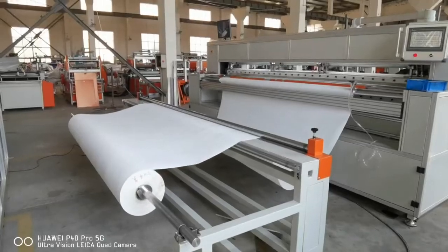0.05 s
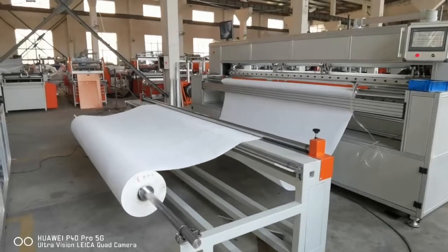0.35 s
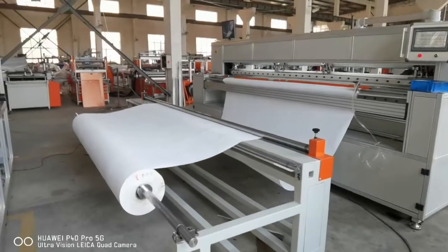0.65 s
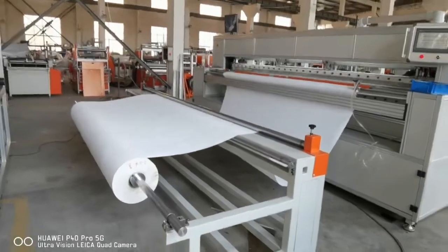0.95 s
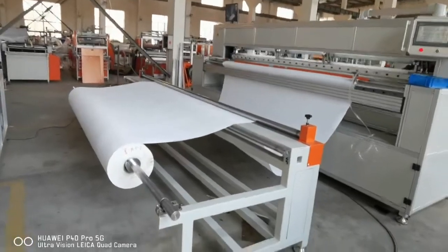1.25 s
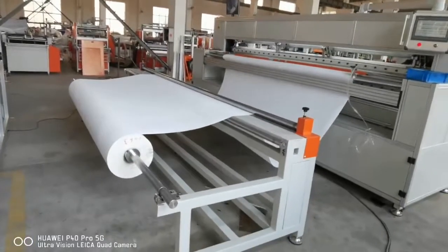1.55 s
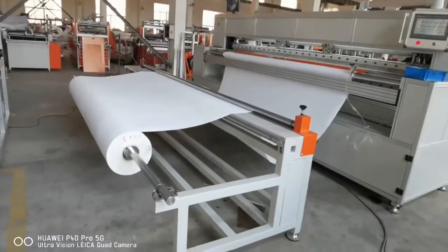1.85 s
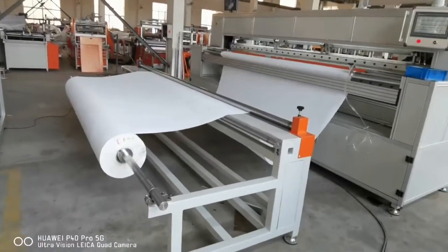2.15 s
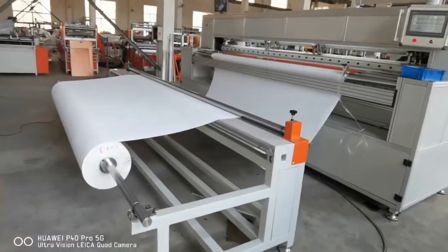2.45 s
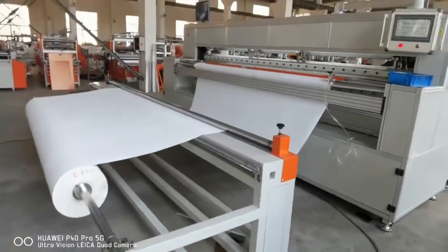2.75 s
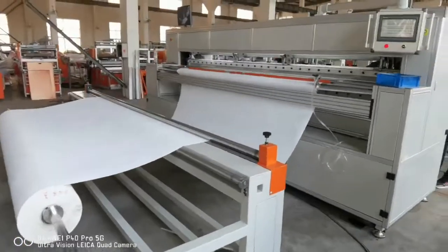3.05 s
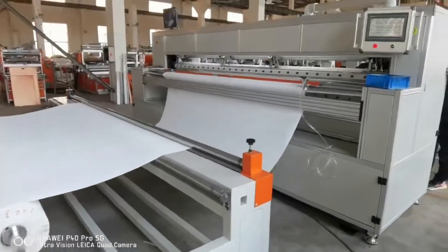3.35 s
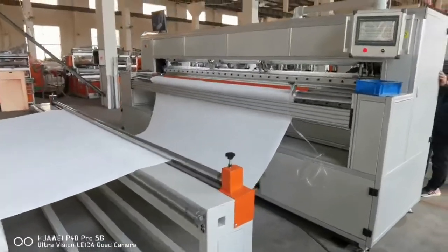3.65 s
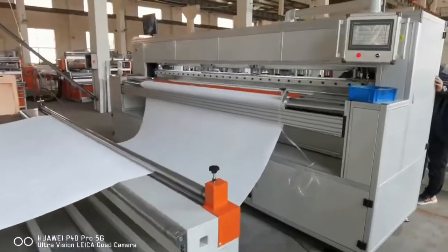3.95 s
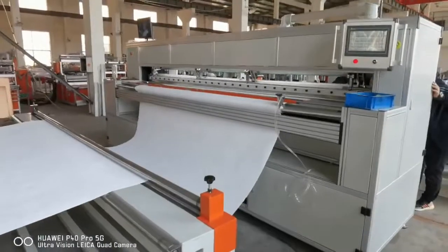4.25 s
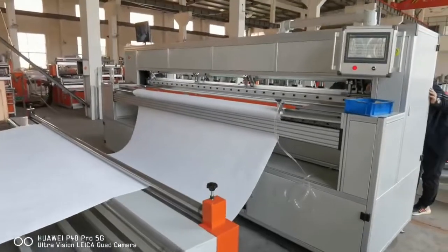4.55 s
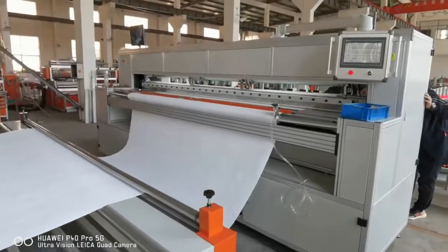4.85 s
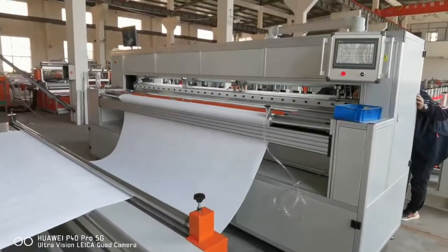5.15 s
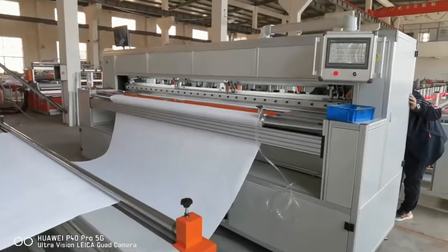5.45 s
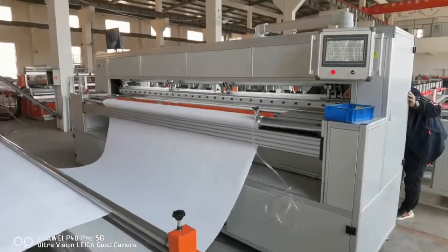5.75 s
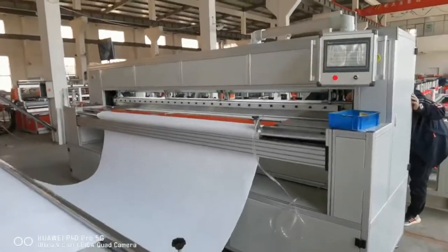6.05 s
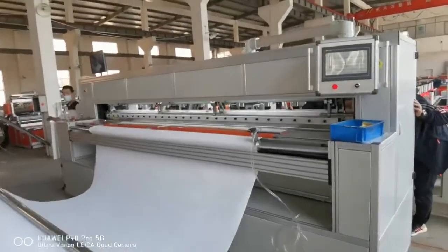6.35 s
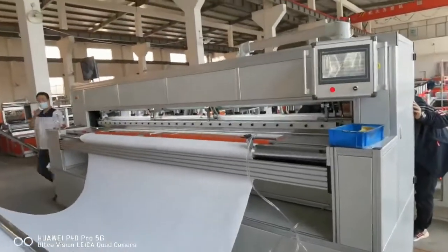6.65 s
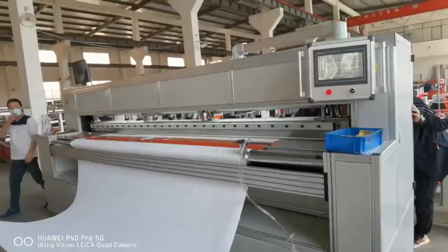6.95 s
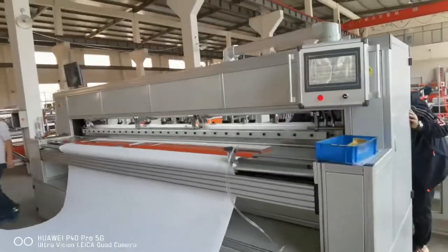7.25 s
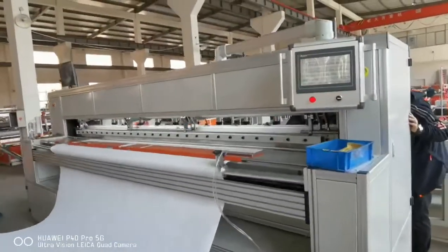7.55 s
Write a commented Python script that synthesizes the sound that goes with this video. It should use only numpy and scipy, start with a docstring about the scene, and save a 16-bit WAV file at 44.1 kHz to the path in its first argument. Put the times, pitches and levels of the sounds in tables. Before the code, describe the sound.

A harsh air blast becomes a fading hiss, then short squealing spurts, while a factory machine whirrs and knocks steadily.

```python
"""A harsh blast of air, close to the microphone, settles into a hissing jet that fades after three seconds.
Out in the factory hall a pleating machine folds filter paper, about one stroke a second:
its drive whirrs up and down, the blade knocks on the steel frame and the pressing bar clacks after it.
As the jet fades, a nearby valve lets out short, squealing spurts of air. Other machines hum far off."""
import sys
import numpy as np
from scipy import signal
from scipy.fft import rfft, irfft
from scipy.io import wavfile
from scipy.ndimage import uniform_filter1d, map_coordinates

SR = 44100
rng = np.random.default_rng(int(sys.argv[2]) if len(sys.argv) > 2 else 0)


def wrap_up_sound(samples):
    """Save the sound to the file named by the first command line argument, as 16-bit audio."""
    columns = np.atleast_2d(samples).T
    # keep every value between -1 and 1, then stretch to whole-number steps
    tamed = np.clip(columns, -1, 1)
    steps = np.round(tamed * 32767).astype(np.int16)
    wavfile.write(sys.argv[1], SR, steps)


N = 334719
T, HZ = np.arange(N) / SR, np.fft.rfftfreq(N, 1 / SR)


# blade knocks: (time [s], click gain [dB], click delay [s], frame gain [dB], clatter gain [dB])
BLADE_KNOCKS = [(.629, -20, .003, -42, -38), (1.65, -16, .004, -38, -42), (2.675, -12, .015, -34.5, -33),
                (3.697, -18.5, .005, -34, -47), (4.698, -14, .004, -40.5, -36),
                (5.722, -14.5, .004, -34, -35), (6.747, -13.5, .002, -34, -36)]
# modes of the steel frame: (frequency [Hz], level [dB], t60 [s])
FRAME_MODES = [(88.5, -3, 0.35), (135.8, -1.5, 0.54), (180, -9, 0.092), (223, -1, 0.32), (258.4, 6, 0.16),
               (319, -5, 0.26), (421, -15, 0.56), (490, -9, 0.086), (643, -6.5, 0.3), (874, -16.5, 0.55)]
# spectrum of loose parts, shaken by blade and bar: (frequency [Hz], level [dB])
CLATTER_SPECTRUM = [(100, -24), (350, -2), (600, -1.5), (900, -4.5), (1200, -9), (1600, -11), (2200, -11),
                    (4000, -23), (9000, -46)]

def blade_knocks():
    """The blade clicks, rings the frame and shakes loose parts, then rebounds and rattles out."""
    out, t = np.zeros(N), np.arange(SR // 2) / SR
    loose_parts = noise(CLATTER_SPECTRUM)
    rattle = impact(t, rise_s=.0032, t60=.1) + .25 * impact(t, rise_s=.009, t60=.48)
    for at, click_db, click_delay, frame_db, clatter_db in BLADE_KNOCKS:
        click = random_slice(loose_parts, t) * impact(t, rise_s=.0007, t60=.035)
        add(out, at + click_delay, gain_of(click_db - 14) * click)
        for delay, strength in [(0, .98), (.028, .59)]:
            clatter = gain_of(clatter_db - 2) * random_slice(loose_parts, t) * rattle
            boom = gain_of(frame_db - .5) * ring(FRAME_MODES, t)
            add(out, at + delay, strength * (boom + clatter))
    return out


# landings of the pressing bar: (time [s], gain [dB], delay of the first bounce [s])
BAR_CLACKS = [(.846, -43, .016), (1.868, -45, .033), (2.892, -40.5, .014), (3.912, -46, .02),
              (4.92, -39.5, .011), (5.939, -35, .015), (6.959, -37, .023)]
# modes of the bar: (frequency [Hz], level [dB], t60 [s])
BAR_MODES = [(95, -1, 0.37), (194, -5.5, 0.22), (452.4, -3, 0.23), (521, 1.5, 0.075), (594, -2.5, 0.15),
             (649, -4.5, 0.16), (806, -15, 0.45), (982, -5.5, 0.11), (1070, -12, 0.13), (1167, 1.5, 0.058),
             (1760, -9, 0.074)]

def bar_clacks():
    """The pressing bar lands and bounces twice, ticking and ringing at each contact."""
    out, t = np.zeros(N), np.arange(SR // 2) / SR
    loose_parts = noise(CLATTER_SPECTRUM)
    for at, db, bounce_s in BAR_CLACKS:
        for delay, strength in [(0, .94), (bounce_s, .87), (bounce_s + .024, .4)]:
            tick = gain_of(4) * random_slice(loose_parts, t) * impact(t, rise_s=.00055, t60=.049)
            add(out, at + delay, strength * gain_of(db) * (ring(BAR_MODES, t) + tick))
    return out


# strokes of the drive: (start [s], whirr gain [dB], thump gain [dB])
DRIVE_STROKES = [(0.105, -48.5, -33), (1.12, -44, -35), (2.14, -43.5, -35), (3.16, -43, -45),
                 (4.17, -41.5, -43), (5.18, -39.5, -38.5), (6.2, -35, -32.5), (7.215, -32.5, -32.5)]
# speed through one stroke: (position [share of the stroke], speed [share of top speed])
STROKE_SPEED = [(0, .36), (.1, .68), (.19, .94), (.29, 1), (.43, .83), (.58, .64), (.75, .48), (.92, .36)]

def drive(stroke_s=1.016, load_db=6, load_s=.14):
    """Rolling parts rumble and gears whine, higher and louder as each stroke gathers speed."""
    starts, whirr_db, _ = np.transpose(DRIVE_STROKES)
    stroke = np.maximum(np.searchsorted(starts, T) - 1, 0)
    age = (T - starts[stroke]) % stroke_s
    speed = np.interp(age / stroke_s, *np.transpose(STROKE_SPEED), period=1)
    labour_db = load_db * np.exp(-age / load_s)  # the drive labours hardest while it speeds up
    rolling = rng.standard_normal(N) * gain_of(2 * waver(59))
    rumble_hz = 275 * speed
    rumble = unit_rms(resonate(resonate(rolling, rumble_hz, 187), rumble_hz, 195))
    _, rumble = split(rumble, 59)
    gear_hz = 268 * speed * (1 + .022 * waver(22))
    whine = np.sin(2 * np.pi * np.cumsum(gear_hz) / SR) * gain_of(-9 + 3.7 * waver(32))
    casing = noise([(90, 0), (150, 3), (300, 4.5), (420, -6), (560, -4),
                    (720, -27), (1200, -25), (3000, -82)])
    whirr = unit_rms(rumble + whine + gain_of(-4) * casing)
    return whirr * speed ** 2.14 * gain_of(whirr_db[stroke] + labour_db)


# slack closing three times a stroke: (delay [s], relative level [dB])
SLACK_BUMPS = [(.008, -0.5), (.095, 0.5), (0.164, -8)]
# spectrum of a thump: (frequency [Hz], level [dB])
THUMP_SPECTRUM = [(25, -30), (55, -5), (90, 15), (140, 13), (260, 5), (400, -1), (700, -28), (2000, -57)]

def slack_thumps():
    """Slack in the drive closes with soft, low bumps as each stroke starts."""
    out, t = np.zeros(N), np.arange(SR // 3) / SR
    body = noise(THUMP_SPECTRUM)
    for start, _, thump_db in DRIVE_STROKES:
        for delay, db in SLACK_BUMPS:
            bump = random_slice(body, t) * impact(t, rise_s=.009, t60=.19)
            add(out, start + delay, gain_of(thump_db + db + 3) * bump)
    return out


# the jet's opening blast: (end [s], level [dB], fall afterwards [dB/s])
BLAST_ENVELOPE = (.17, -30, 200)
# its spectrum: (frequency [Hz], level [dB])
BLAST_SPECTRUM = [(1800, -8), (2400, -8), (2850, -35), (3250, -12), (3700, -5), (4700, -12), (5400, -2),
                  (7300, -2), (8100, 0), (8750, -4), (9200, -25), (14000, -40)]
# its resonances: (frequency [Hz], width [Hz], lift [dB])
BLAST_RESONANCES = [(3900, 550, 8), (6550, 220, 11), (8600, 450, 10)]

def jet_blast():
    """At full pressure the jet tears harshly, close to the microphone, then drops back."""
    ends, level_db, fall_db_per_s = BLAST_ENVELOPE
    envelope_db = level_db - fall_db_per_s * np.maximum(T - ends, 0)
    return noise(BLAST_SPECTRUM, BLAST_RESONANCES) * gain_of(envelope_db + 2.5 * jitter(160))


# the jet at the microphone: (time [s], level [dB], extra roar [dB], extra top [dB])
JET_LEVELS = [(0, -24, 8, 0.5), (.14, -22, 2, -3), (.21, -29.5, 7, 4), (.62, -29.5, 6, 4),
              (.95, -24.5, -0.5, -2.5), (1.55, -25, -1.5, 0), (2.5, -24.5, -2, -3.5), (3.2, -32, 1.5, 2),
              (3.45, -35.5, 2, -4.5), (3.75, -38, 2, 0.5), (4.15, -43, 9, 0), (7.59, -50, 15, -3)]
# its spectrum: (frequency [Hz], level [dB])
JET_SPECTRUM = [(300, -4.5), (1000, -16), (1600, -13), (2400, -13.5), (3200, -3.5), (4500, -9), (7000, 2),
                (9500, -4.5), (10500, 2.5), (11900, -11.5), (13300, -7.5), (14200, -9)]
# its resonances: (frequency [Hz], width [Hz], lift [dB])
JET_RESONANCES = [(2160, 1020, 14), (2816, 136, -21), (3640, 1100, 0), (4536, 890, 12.5), (6160, 870, 13),
                  (7060, 360, -11), (8370, 1520, 14)]
# the resonances sink as the pressure drops: (time [s], pitch [ratio])
JET_PITCH = [(0, 1.03), (.15, 1.035), (.35, 1.008), (.9, 1.005), (1.6, .997), (2.9, .985)]
# a low puff as the jet dies away: (time [s], gain [dB], rise [s], t60 [s])
JET_PUFF = (3.255, -24.5, 0.17, .5)

def air_jet():
    """A fluttering jet ends in a puff; its roar and top change with the angle to the nozzle."""
    steady = noise(JET_SPECTRUM, JET_RESONANCES)
    sagging = map_coordinates(steady, [np.cumsum(curve(JET_PITCH)) % (N - 1)], order=5, mode="mirror")
    flow = shimmer(sagging, depth_db=3, drift_s=.07, band_hz=85)
    roar, hiss = split(flow, 4220)
    middle, top = split(hiss, 6040)
    low_roar, upper_roar = split(roar, 2600)
    at, puff_db, rise_s, t60 = JET_PUFF
    puff = unit_rms(low_roar) * gain_of(puff_db) * impact(np.maximum(T - at, 0), rise_s, t60)
    flickering_roar = np.std(upper_roar) * shimmer(upper_roar, depth_db=7, drift_s=.08, band_hz=400)
    roar = (low_roar + flickering_roar) * level_dip() * gain_of(curve(JET_LEVELS, column=2) + 1.7 * waver(26))
    top = top * gain_of(curve(JET_LEVELS, column=3) + waver(13))
    flutter_db = .6 * waver(30) + .5 * waver(250)
    return (roar + middle + top) * gain_of(curve(JET_LEVELS) + flutter_db) + puff


# valve openings: (cracks open [s], rise [s], opens fully [s], shuts [s], gain [dB], extra rush [dB])
VALVE_SPURTS = [(2.945, 0.0055, 2.995, 3.335, -25.5, 0), (4.36, 0.05, 4.41, 4.6, -26.5, 0),
                (5.015, 0.016, 5.055, 5.25, -27, -1), (5.548, 0.0063, 5.695, 5.782, -25.5, 0),
                (6.407, .003, 6.47, 6.818, -25.5, 5), (7.378, 0.0072, 7.52, 7.59, -25.5, -1)]
# spectrum of a spurt: (frequency [Hz], level [dB])
SPURT_SPECTRUM = [(1700, -55), (2850, -62), (3150, -29), (4500, -37), (5700, -10.5), (6900, -14),
                  (7800, 5.5), (9000, 6.5), (10000, 14.5), (10700, 8.5), (11300, -1), (12200, -2.5),
                  (12900, -2), (14000, -6.5)]
# its resonances: (frequency [Hz], width [Hz], lift [dB])
SPURT_RESONANCES = [(3650, 500, 2), (5000, 150, -5), (5930, 220, 6), (7650, 260, 6), (9495, 60, 4),
                    (10692, 80, 4), (11597, 80, 4), (12417, 70, 3), (13399, 70, 5), (13864, 70, 4)]
# spits and stalls: (time [s], half-length [s], extra fizz [dB], extra sizzle [dB], extra rush [dB])
SPURT_SPITS = [(2.953, .008, 4, 0, 0), (3.105, .015, 1, 2, 4), (3.143, .012, 5, 0, -4),
               (3.16, .014, 0, 0, -9), (3.225, .02, 2, 4, 4), (3.315, .03, 2, 1, 1),
               (4.49, .012, -3, -1, 0), (4.51, .009, 7, 6, -3), (4.528, .013, -2, -3, -8),
               (4.585, .025, 4, 4, 3), (5.035, .008, 2, 0, 6), (5.055, .01, -4, -2, 0),
               (5.078, .012, 5, 3, -2), (5.125, .025, 3, 1, -8), (5.2, .035, 0, 5, 3),
               (5.56, .007, -1, 6, 6), (5.73, .02, 6, 2, -4), (5.755, .008, 1, 0, 4), (5.783, .01, 1, 5, 0),
               (6.413, .007, 2, 0, 6.5), (6.437, .012, -2, -6, -2), (6.455, .012, 6, -2, 2),
               (6.475, .01, 0, -5, -2), (6.515, .025, 0, 1, 3), (6.6, .03, 0, 2, 2), (6.68, .025, 1, 0, 2),
               (7.387, .009, 1, -1, 10), (7.408, .011, -10, -12, -6), (7.43, .013, 3, 3, 7),
               (7.458, .018, 8, 2, 4), (7.5, .015, 3, 0, -4), (7.572, .02, 2, 2, 3)]

def valve_spurts(cracked_db=-3, open_s=.0079, bleed_db_per_s=137, rush_lag_db=5, rush_build_s=.45):
    """A close valve cracks, opens and bleeds out: fizz and sizzle above a throaty, squealing rush."""
    body, fizz = split(noise(SPURT_SPECTRUM, SPURT_RESONANCES), 10460)
    rush, sizzle = split(shimmer(body, depth_db=11, drift_s=.1, band_hz=75), 7000)
    fizz = shimmer(fizz, depth_db=9, drift_s=.16, band_hz=75)
    spits = (np.outer(extra_db, swell(at, half_s)) for at, half_s, *extra_db in SPURT_SPITS)
    fizz_db, sizzle_db, rush_db = sum(spits)
    fizz = steadied(fizz) * gain_of(fizz_db + waver(37))
    sizzle = steadied(sizzle) * gain_of(sizzle_db - 2.8)
    rush = steadied(unit_rms(rush) + gain_of(3.5) * squeal())
    rasp_db = 1.2 * jitter(260)
    rush = rush * gain_of(rush_db + rasp_db - 2.7) + sizzle
    out = np.zeros(N)
    for cracks, rise_s, opens, shuts, db, extra_rush_db in VALVE_SPURTS:
        age = np.maximum(T - cracks, 0)
        opening = np.clip((T - opens) / open_s, 0, 1)
        bleed_db = bleed_db_per_s * np.maximum(T - shuts, 0)
        flow = np.minimum(age / rise_s, 1) * gain_of(db + cracked_db * (1 - opening) - bleed_db)
        # the rush builds up later than the fizz
        build_up = gain_of(extra_rush_db - rush_lag_db * np.exp(-age / rush_build_s))
        out += flow * (fizz + rush * build_up)
    sputter_db = .8 * waver(48) + .5 * waver(380)
    return out * gain_of(sputter_db - 2.5)


# narrow resonances that squeal in a spurt: (frequency [Hz], level [dB])
SQUEAL_TONES = [(2450, -16), (2950, -11), (3130, -9.5), (3310, -9), (3473, -5), (3655, -5.5), (3855, -4.5),
                (4150, -6), (4340, -5.5), (4540, -3.5), (4720, -5), (4880, -7), (5200, -6), (5420, -7),
                (5650, -2), (5930, 1), (6110, -2), (6420, -3)]

def squeal(swing_db=5.5):
    """The flow sings in a cluster of rough, metallic tones that come and go."""
    return unit_rms(sum(rough_tone(hz) * gain_of(db + swing_db * jitter(20)) for hz, db in SQUEAL_TONES))


# brief whistles: (time [s], half-length [s], frequency [Hz], level [dB])
AIR_WHISTLES = [(3.28, .05, 3472, -33), (3.25, .04, 3640, -40), (3.27, .05, 3815, -36.5),
                (3.24, .05, 6130, -36), (3.27, .06, 4550, -41), (3.28, .06, 5885, -36),
                (3.25, .05, 6410, -36), (3.28, .05, 7630, -35), (3.26, .05, 7850, -34),
                (3.26, .07, 13400, -40), (3.15, .13, 13830, -40), (4.468, .03, 3854, -37),
                (4.575, .035, 3655, -39), (4.57, .04, 4533, -41), (4.5, .06, 12050, -38),
                (5.235, .04, 3470, -39), (5.22, .05, 3700, -40), (5.76, .03, 3250, -39),
                (5.775, .03, 2950, -41), (5.78, .025, 7700, -34), (6.68, .12, 7700, -35),
                (6.64, .03, 2950, -39), (7.55, .035, 3655, -40), (7.562, .025, 5911, -32),
                (7.52, .08, 10700, -32)]

def air_whistles():
    """Near the microphone the escaping air now and then locks onto a resonance and whistles."""
    return sum(rough_tone(hz) * gain_of(db) * swell(at, half_s) for at, half_s, hz, db in AIR_WHISTLES)


# whine of the servo: (time [s], level [dB])
SERVO_LEVELS = [(0, -60), (3.3, -50), (4.2, -50.5), (4.9, -47.5), (5.8, -49), (7.59, -53)]

def servo_whine():
    """The servo holds one thin, faint note behind the air."""
    return rough_tone(hz=4533, jitter_hz=22, flutter_db=2) * gain_of(curve(SERVO_LEVELS))


# drones after the hardest blows: (time [s], half-length [s], frequency [Hz], level [dB])
LOW_DRONES = [(5.9, 0.21, 121, -41.5), (7.044, 0.12, 210, -41.5)]

def low_drones():
    """Narrow, low resonances swell and fade in the hall."""
    out = np.zeros(N)
    for at, half_s, hz, db in LOW_DRONES:
        pitch = np.full(N, hz)
        drone = resonate(resonate(rng.standard_normal(N), pitch, 45), pitch, 47)
        out += unit_rms(drone) * gain_of(db) * swell(at, half_s)
    return out


# shudders of the floor: (time [s], level [dB])
FLOOR_SHUDDERS = [(.17, -43), (.6, -47), (1.2, -47), (1.5, -53)]

def floor_shudders():
    """The floor under the microphone shudders deeply a few times."""
    rumble = noise([(25, -30), (42, -13), (55, 3), (85, -12), (140, -4.5), (400, -42)])
    envelope = sum(gain_of(db) * swell(at, half_s=.24) for at, db in FLOOR_SHUDDERS)
    return rumble * gain_of(1.7 * waver(21)) * envelope


# hum of the hall: (frequency [Hz], level [dB])
HUM_SPECTRUM = [(20, -27), (45, -37), (75, -5), (120, 6), (210, 6), (300, -4), (480, -7.5), (630, -1.5),
                (750, -8), (1200, -7), (2000, -5.5), (5000, -17)]
# distant air hiss: (frequency [Hz], level [dB])
HISS_SPECTRUM = [(500, -26), (1300, -37), (1800, -22), (2400, 2), (3200, -6), (4500, 2.5), (5500, 1),
                 (7000, -1.5), (8300, 5.5), (9400, 2.5), (10600, 1), (11600, -19), (12600, -49),
                 (14000, -49)]
# its resonances: (frequency [Hz], width [Hz], lift [dB])
HISS_RESONANCES = [(4460, 750, 1.1), (4990, 51, 9.5), (6310, 1440, 8.9)]

def hall_ambience(hum_db=-47.5, approach_db_per_s=.52, hiss_db=-36.5):
    """Other machines hum and air hisses from afar; the hum grows on the way to the machine."""
    hum = noise(HUM_SPECTRUM, resonances=[(869, 15, 7.8), (206, 66, .61)])
    hum = shimmer(hum, depth_db=10, drift_s=.06, band_hz=107)
    hum *= gain_of(hum_db + approach_db_per_s * T + .24 * waver(32))
    hiss = shimmer(noise(HISS_SPECTRUM, HISS_RESONANCES), depth_db=3, drift_s=.06, band_hz=60)
    hiss *= gain_of(hiss_db + .5 * waver(28))
    return (hum + hiss) * level_dip()


def level_dip(at=3.06, half_s=.08, depth_db=7):
    """The hall's ambience and the jet's roar dip briefly."""
    return gain_of(-depth_db * swell(at, half_s))


def hall_reverb(x, t60, wet_db):
    """The direct sound reaches the microphone with the hall's diffuse tail behind it."""
    tail = rng.standard_normal(SR) * impact(np.arange(SR) / SR, .0053, t60)
    return x + gain_of(wet_db) * signal.fftconvolve(x, tail / np.linalg.norm(tail))[:N]


def gain_of(db):
    return 10 ** (np.asarray(db) / 20)


def unit_rms(x):
    return x / np.sqrt(np.mean(x ** 2) + 1e-20)


def steadied(x):
    """A noise held at unit strength, keeping only its fast flutter."""
    return x / np.sqrt(abs(uniform_filter1d(x ** 2, size=2048)) + 1e-20)


def curve(rows, column=1):
    """One column of a time table at every sample."""
    rows = np.array(rows)
    return np.interp(T, rows[:, 0], rows[:, column])


def add(mix, at, sound):
    part = mix[max(round(at * SR), 0):][:len(sound)]
    part += sound[:len(part)]


def random_slice(x, t):
    return np.roll(x, rng.integers(N))[:len(t)]


def impact(t, rise_s, t60):
    """Envelope of a blow: quick rise, exponential fall."""
    return (1 - np.exp(-t / rise_s)) * np.exp(-np.log(1000) * t / t60)


def swell(at, half_s):
    """A smooth rise and fall around a moment."""
    return np.exp(-((T - at) / half_s) ** 2)


def ring(modes, t):
    """Modes rung by one blow, a little different each time."""
    hz, db, t60 = np.array(modes).T[:, :, None]
    detune, phase = rng.uniform(-.88, 1, (2, len(modes), 1))
    partials = np.sin(2 * np.pi * hz * (1 + .03 * detune) * t + np.pi * phase)
    return (gain_of(db) * impact(t, .0019, t60) * partials).sum(0)


def rough_tone(hz, jitter_hz=32, flutter_db=2.5):
    """A tone that trembles in pitch and strength."""
    turns = np.cumsum(hz + jitter_hz * jitter(160)) / SR
    return unit_rms(np.sin(2 * np.pi * turns) * gain_of(flutter_db * jitter(160)))


def noise(spectrum, resonances=()):
    """Steady noise with a broad spectrum and bell-shaped resonances."""
    corners_hz, levels_db = np.transpose(spectrum)
    db = np.interp(np.log(HZ + 1), np.log(corners_hz), levels_db)
    db += sum(lift / (1 + (2 * (HZ - hz) / width) ** 2) for hz, width, lift in resonances)
    low_cut = 1 / np.sqrt(1 + (corners_hz[0] / (HZ + 1)) ** 4)
    return unit_rms(irfft(rfft(rng.standard_normal(N)) * gain_of(db) * low_cut, N))


def split(x, hz):
    """The parts of a sound below and above a frequency."""
    low = irfft(rfft(x) / (1 + (HZ / hz) ** 12), N)
    return low, x - low


def resonate(x, hz, width_hz):
    """A resonance of gain 1 that follows the curve hz."""
    carrier = np.exp(2j * np.pi * np.cumsum(hz) / SR)
    pole = np.exp(-np.pi * width_hz / SR)
    return 2 * (carrier * signal.lfilter([1 - pole], [1, -pole], x / carrier)).real


def waver(per_s):
    """Smooth random drift of unit size, up to a given rate."""
    return unit_rms(irfft(rfft(rng.standard_normal(N)) * np.exp(-(HZ / per_s) ** 2) * (HZ > 1), N))


def jitter(per_s):
    """Random values of unit size, joined at a given rate."""
    points = rng.standard_normal(4096)
    return np.interp(T * per_s, np.arange(len(points)), points)


def shimmer(x, depth_db, drift_s, band_hz):
    """Narrow peaks and dips drift through a noise."""
    frames = signal.stft(x, nperseg=1024, noverlap=768)[2]
    across_bands = np.fft.fftfreq(frames.shape[0], SR / 1024)[:, None]
    along_time = np.fft.fftfreq(frames.shape[1], 256 / SR)
    smoothing = np.exp(-(across_bands * band_hz) ** 2 - (along_time * drift_s) ** 2)
    patches = np.fft.ifft2(np.fft.fft2(rng.standard_normal(frames.shape)) * smoothing).real
    ripple = gain_of(depth_db * np.minimum(unit_rms(patches), 1.2))
    return unit_rms(signal.istft(frames * ripple, nperseg=1024, noverlap=768)[1][:N])


def scene():
    """One microphone in the hall: the machine carries through the room, the air is near and almost dry."""
    machine = hall_reverb(drive() + blade_knocks() + bar_clacks() + slack_thumps(), t60=1, wet_db=-8)
    valve = hall_reverb(valve_spurts() + air_whistles(), t60=.7, wet_db=-46)
    background = servo_whine() + hall_ambience() + floor_shudders() + low_drones()
    mono = machine + valve + background + air_jet() + jet_blast()
    return np.array([mono, mono])


def record(dry):
    """The microphone's band limit cuts off the highest hiss."""
    edge_hz = 14080
    low_pass = signal.firwin(801, edge_hz, window=("kaiser", 9), fs=SR)
    return signal.oaconvolve(dry, low_pass[None], "same")


dry = scene()
out = record(dry)
wrap_up_sound(out)
```